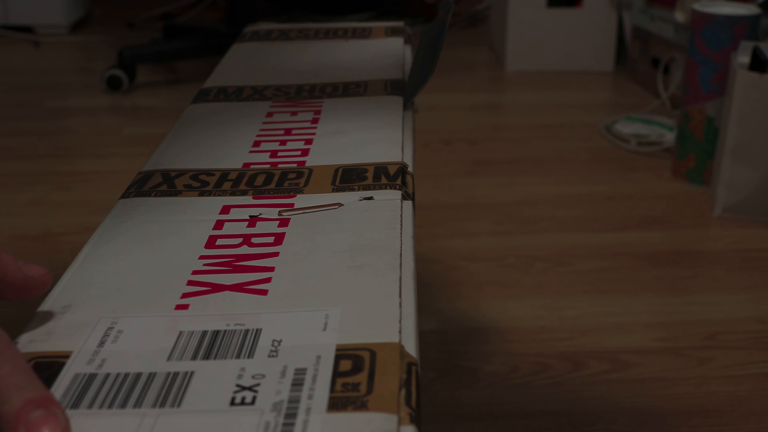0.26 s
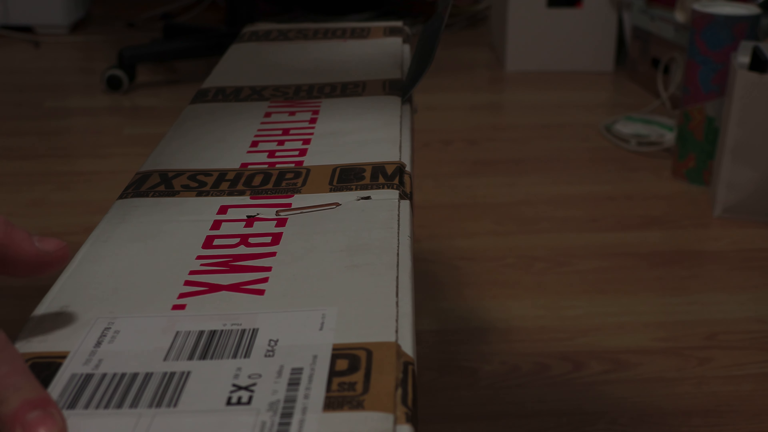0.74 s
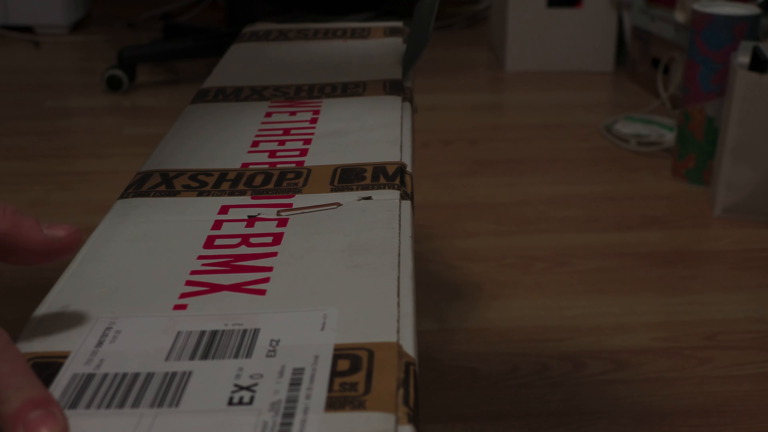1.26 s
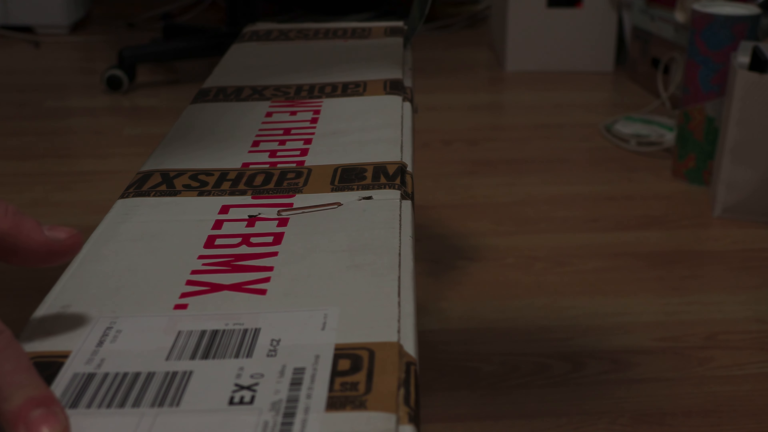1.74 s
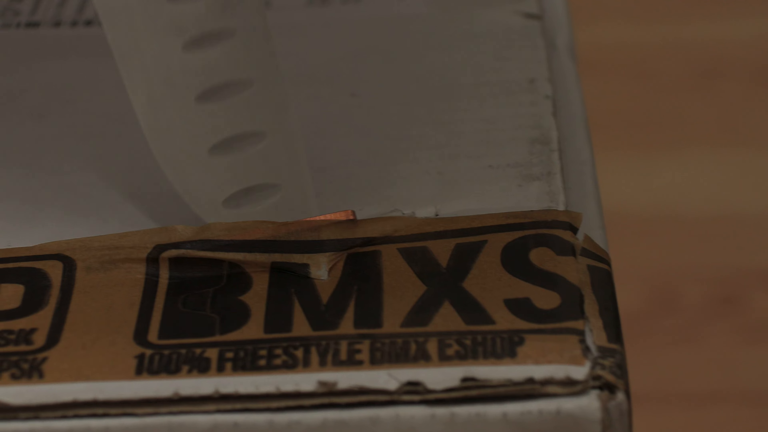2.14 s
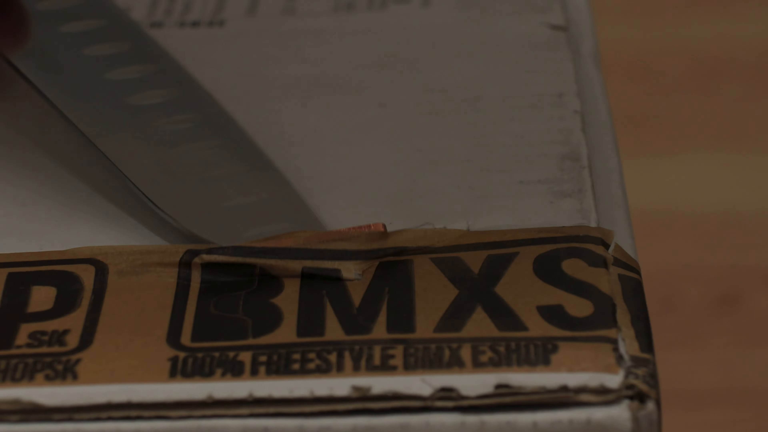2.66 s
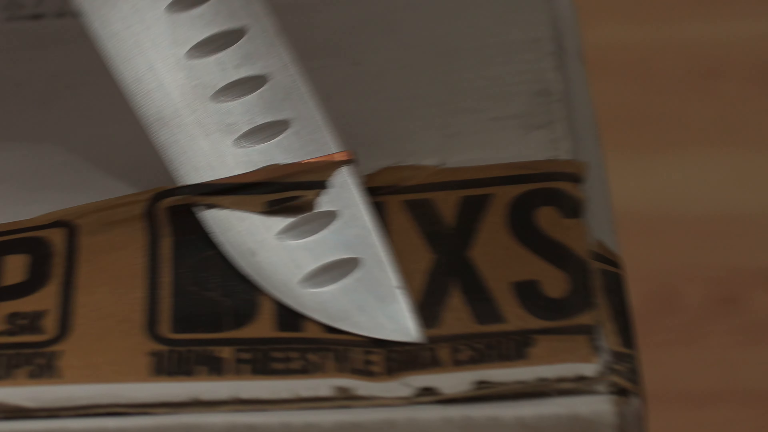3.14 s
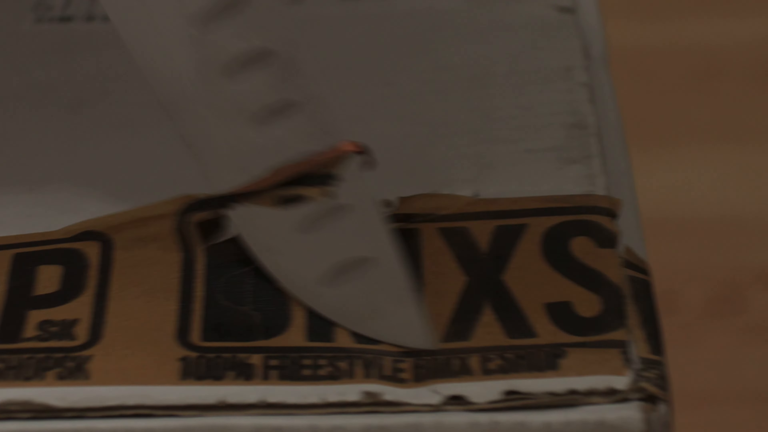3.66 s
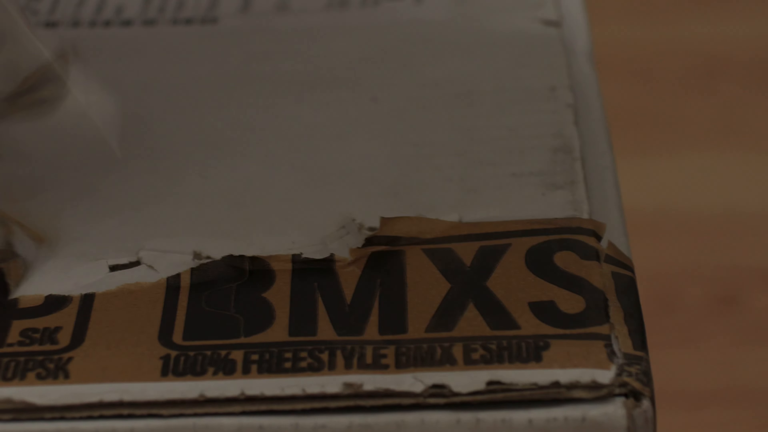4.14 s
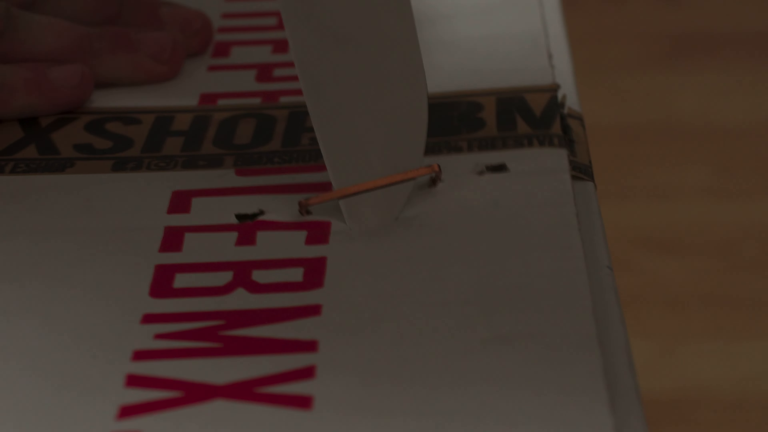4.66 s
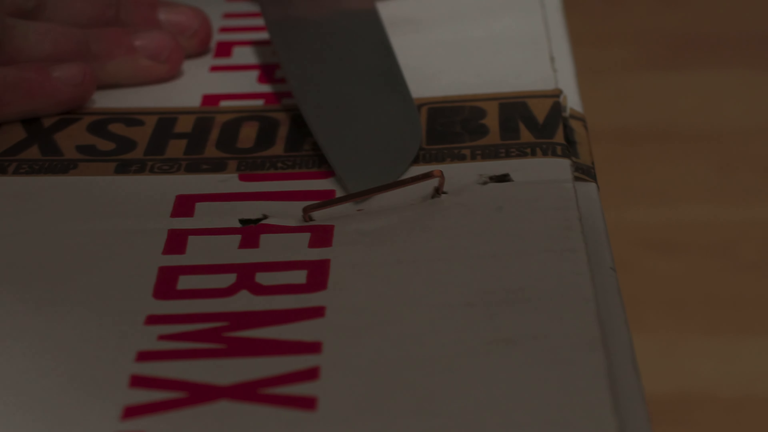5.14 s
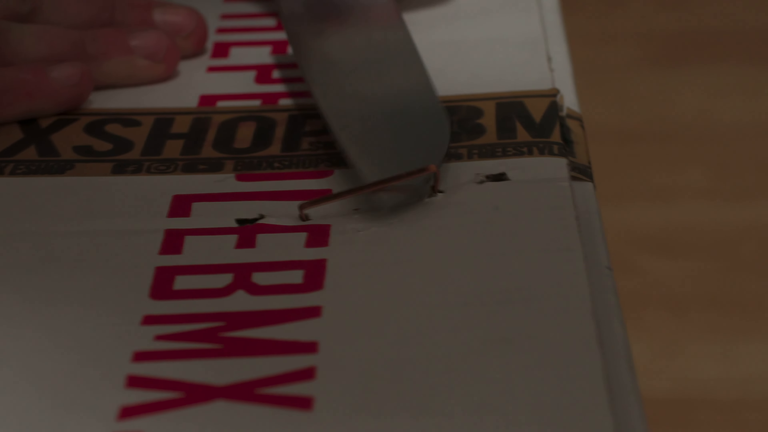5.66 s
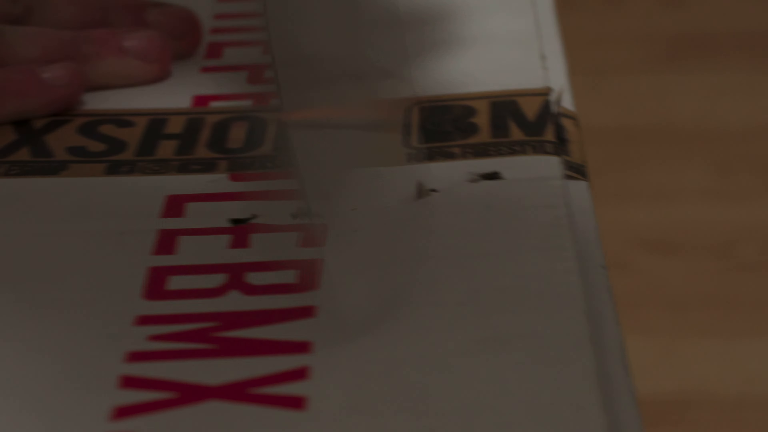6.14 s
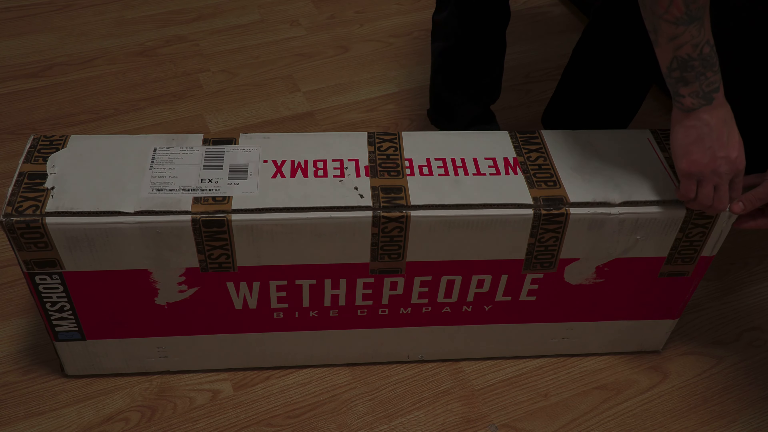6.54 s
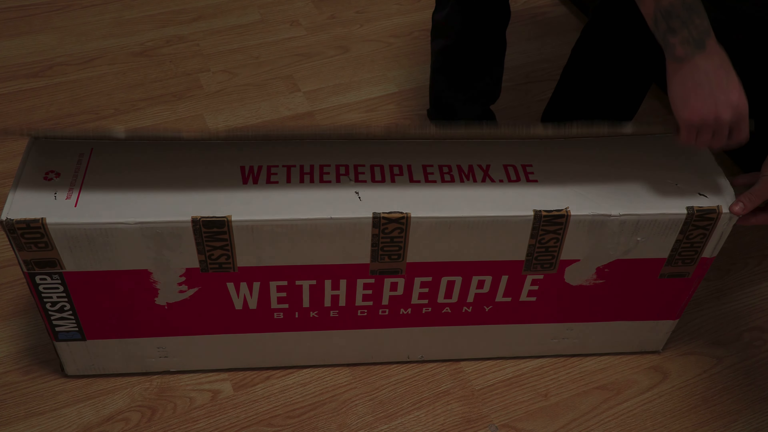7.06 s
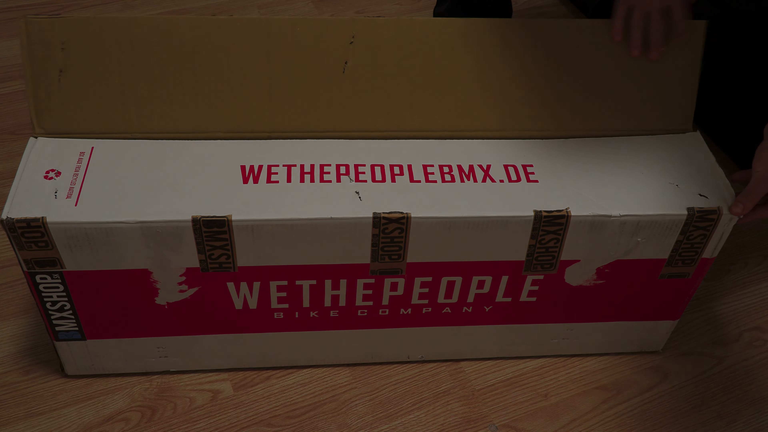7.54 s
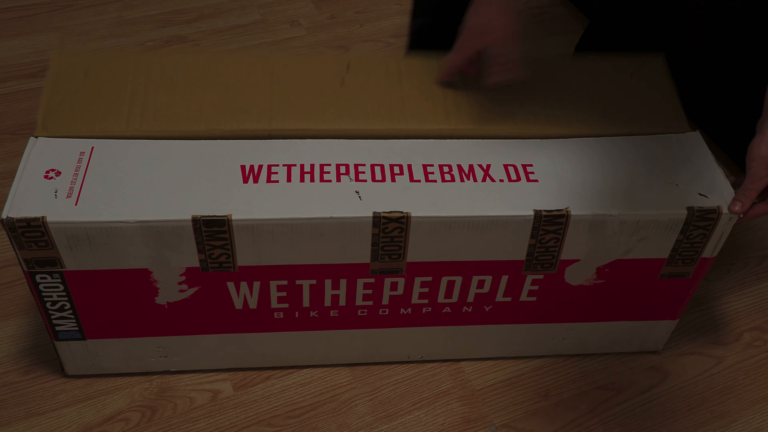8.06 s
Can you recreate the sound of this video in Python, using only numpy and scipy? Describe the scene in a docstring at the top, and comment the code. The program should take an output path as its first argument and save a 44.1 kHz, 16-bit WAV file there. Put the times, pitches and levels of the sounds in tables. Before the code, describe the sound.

A knife scrapes and saws at strapping and tape on a hollow cardboard box, with sharp snaps, boxy thumps and finally a quiet lid lift.

```python
"""A knife works under tape and staples of a long cardboard box in a hard-floored room, near a microphone pair.
Blade friction is heard from the start as stick-slip clicks through filters; fibres snap as short noise bursts.
Blows and friction excite the hollow box's modes, jolts ring the steel, and low noise swells in thuds, from the
floor or with the loudest blows. A freed staple chatters after 6.19 s; at last a hand lifts the lid, with
lighter strokes and knocks. Five shots are spliced together, and each splice cuts the room's tail short."""
import sys
import numpy as np
from scipy import signal
from scipy.fft import rfft, irfft
from scipy.io import wavfile
from scipy.ndimage import uniform_filter1d

SR = 44100
rng = np.random.default_rng(int(sys.argv[2]) if len(sys.argv) > 2 else 0)


def to_wav(s):
    """Save 16-bit WAV."""
    ch = np.atleast_2d(s).T  # columns
    pcm = np.round(np.clip(ch, -1, 1) * 32767)  # PCM
    wavfile.write(sys.argv[1], SR, pcm.astype(np.int16))


def boost(x):
    """Linear amplitude factor 10**(x/20) for a level x in decibels (scalar or array-like)."""
    u = np.asarray(x, float) / 20
    return 10 ** u


N = 366453  # samples

# Bounds of the five shots. Each entry: time in seconds.
SPLICE_TIMES = [0, 1.371, 2.126, 4.259, 6.443, 8.4]

# Spectrum of the quiet room's air and hiss. Each row: frequency in Hz, relative density in dB per Hz.
AIR_SPECTRUM = [(18, -51), (30, -60), (75, -42), (115, -36), (155, -7), (210, 1), (780, 6), (1250, 8.5),
                (1460, 6), (1630, 5.5), (2010, 5), (7870, -6.5), (14800, -20), (16000, -51)]
AIR_DB = -55  # rms over both channels
# Faint steady tones. Each row: frequency in Hz, rms level in dB, start in seconds.
WHINES = [(7671, -71, 0), (1750, -63, 6.443)]

# Low thuds: floor boards under shifting weight, and dull thumps that come with the loudest blows. Each row:
# time of greatest level in seconds, level in dB.
LOW_THUDS = [(0.0, -54), (1.16, -52), (1.27, -50), (1.43, -43.5), (2.61, -54), (2.94, -42), (3.75, -47.5),
             (3.86, -44), (4.21, -46.5), (4.47, -56.5), (5.0, -54), (5.34, -57), (5.62, -55), (6.2, -41),
             (6.3, -36.5), (6.48, -46.5), (6.69, -43), (6.9, -48.5), (7.91, -44.5), (8.22, -53)]
THUD_RISE_S, THUD_FALL_S = 0.083, 0.13  # each for 20 dB
RUMBLE_DB = -68.5  # steady floor of the rumble

# Jolts that set the steel ringing. Each row: start in seconds, peak level in dB.
STEEL_JOLTS = [(4.195, -28), (4.244, -27), (5.023, -33), (5.622, -23), (5.654, -31), (6.193, -14),
               (6.211, -15), (6.224, -14), (6.243, -15), (6.262, -10)]
# Modes of the blade. Each row: frequency in Hz, relative level in dB, 60 dB decay time in seconds.
STEEL_MODES = [(4161, -6, .04), (5090, -5, .035), (6105, -7, .07), (6625, -4, .12), (7440, -2, .06),
               (7600, 0, .035), (7750, -3, .035), (8823, -6, .045), (9905, -6, .045), (10520, -7, .04),
               (11990, -10, .05), (12420, -10, .04), (13885, -9, .1), (14500, -15, .04), (14950, -20, .05)]
# Chatter of the freed staple. Each row: time in seconds, drive level in dB.
STAPLE_CHATTER = [(6.19, -27), (6.27, -26), (6.32, -36), (6.41, -52)]

# Lower card panels, below about 600 Hz. Each row: frequency in Hz, bandwidth in Hz, relative energy in dB.
LOWER_PANELS = [(332.5, 32, -1.5), (396, 44, -1), (478, 55, 1.5), (532.6, 54, 1.5), (601, 26, -8.5)]
# Upper card panels, from about 600 Hz up. Each row: frequency in Hz, bandwidth in Hz, relative energy in dB.
UPPER_PANELS = [(673, 94, 11.5), (741, 58, 7.5), (761, 30, 5.5), (845, 77, 1.5), (996, 134, 5.5),
                (1138, 140, 3.5), (1287, 20, -6.5)]
# Air in the box. Each row: frequency in Hz, bandwidth in Hz, relative energy in dB.
AIR_CAVITY = [(139.4, 8, -7), (190, 36.5, 3), (268.3, 66, 1.5)]
# Knocks and jerks of the box, which shudders on. Each row: start in seconds, lower-panel level in dB, # upper-
# panel level in dB, cavity level in dB, time to lose 20 dB in seconds (1 ms at least).
BOX_KNOCKS = [(0.0, -58, -56, -45, 0.23), (.046, -67, -67, -51, 0.5), (.19, -49, -63, -52, -0.2),
              (.265, -38, -55, -52, -0.4), (.315, -41, -47.5, -51, 0.13), (.649, -48, -53, -59, 0.3),
              (1.06, -42, -54, -50, 0), (1.093, -30.5, -36, -42, -0.6), (1.147, -36, -32, -35, -0.4),
              (1.378, -45, -49, -54, 0.74), (1.413, -25, -30, -23, .06), (1.51, -43, -45, -50, 0.1),
              (1.57, -42, -54, -51, 0.24), (1.608, -38, -40.5, -35, 0.07), (1.65, -47, -48, -43, 0.04),
              (1.746, -38, -43, -48, .05), (1.99, -46, -46, -58, .1), (2.015, -47, -51, -52, .1),
              (2.276, -63, -51, -57, 0.05), (2.49, -51, -47, -62, 0.1), (2.623, -32, -29, -45, 0.08),
              (2.87, -31.5, -31, -48, 0.23), (2.916, -18, -10.5, -36, 0.0778),
              (2.945, -18.5, -15.5, -51, 0.0974), (2.985, -30, -24, -47, .06),
              (3.064, -47, -41.5, -59, 0.45), (3.699, -51, -34, -51, 0.28),
              (3.729, -20, -13.5, -34, 0.0063), (3.76, -38, -32, -46.5, 0.2), (3.847, -32, -23, -38, 0.06),
              (3.856, -19, -19.5, -39, .04), (4.105, -40, -41, -57, .1), (4.135, -40.5, -40.5, -50, 0),
              (4.195, -35.5, -40.5, -45, 0.06), (4.245, -52, -45, -44, .05),
              (4.452, -28.5, -33, -27.5, 0.1), (4.481, -32, -30, -44, .07), (4.561, -51, -48, -49, 0.23),
              (4.819, -44, -58, -48, .07), (4.924, -52, -50, -46, 1), (4.978, -24, -28, -28.5, 0.03),
              (5.023, -27.5, -27, -17.5, 0.02), (5.042, -44, -39, -25.5, 0.05),
              (5.1, -44, -47.5, -34, 0.04), (5.143, -50, -45, -44.5, 0.18), (5.3, -47, -42.5, -47, 0.16),
              (5.355, -44, -57, -33, .09), (5.624, -25, -19, -13, 0.1), (5.823, -41, -36, -49, 0.33),
              (6.06, -50, -40, -55, -0.1), (6.175, -24.5, -25, -19.5, -0.06),
              (6.189, -19.5, -16.5, -15, .15), (6.22, -26, -22, -18, 0.09), (6.255, -25.5, -32, -31, 0.1),
              (6.379, -43, -41, -44, 0), (6.64, -31, -32.5, -31, 0.01), (6.675, -39, -56, -36.5, 0.18),
              (6.859, -45, -47, -50, 0.18), (7.1, -57, -64.5, -61, 0.5), (7.529, -50.5, -56, -62, 0.1),
              (7.61, -66, -56, -61, 1), (7.862, -43.5, -48, -33.5, 0.18), (7.892, -50, -47.5, -43, .15),
              (8.132, -41, -46.5, -54, .1)]
BLOW_DB, SETTLE_S = 3.5, 0.0017  # peak of the first blow re the shudder; the shudder's 20 dB onset
# Friction drive of the box. Each entry: level in dB re a scrape of -40 dB, for lower panels, upper panels,
# cavity.
BOX_SHARE_DB = [-12, -11.5, -24]
BOX_FOLLOW = 0.71  # dB of box for each dB of scrape above -40: hard tearing is mostly tape

# Tape and fibres that snap. Each row: start in seconds, crack peak in dB, crack centre in Hz,
# sharp-edge peak in dB re crack.
SNAPS = [(0.0468, -20.5, 2670, -21), (0.177, -27.5, 2660, -14), (0.203, -33, 3470, -15),
         (0.2538, -36, 2470, -16), (0.6038, -39, 2940, -14), (0.649, -30, 3020, -20), (.934, -38, 7000, -7),
         (1.094, -23, 2070, -8.5), (1.1461, 1.5, 2680, -28), (1.4138, -12.5, 3730, -1.5),
         (1.5707, -29, 2400, -14), (1.609, -18, 2600, -10), (1.6493, -19.5, 5550, -21),
         (1.7461, -31, 3500, -8), (1.8513, -34, 8000, -10), (1.9413, -35, 3060, -9), (2.011, -31, 2920, 0),
         (2.1552, -20, 4430, -25), (2.2053, -29, 5000, -11), (2.2757, -30, 2720, -4), (2.3, -21, 6440, -20),
         (2.6242, -1, 3200, -15), (2.785, -27, 3370, -13), (2.8697, -17, 4500, -12),
         (2.9156, -1, 2030, -29), (2.9439, -6, 1280, -30), (2.989, -19, 6500, -15),
         (3.0665, -15.5, 2280, -16), (3.1168, -25.5, 2420, -20), (3.1608, -29, 2500, -10),
         (3.21, -20, 4570, -21), (3.3548, -22.5, 4130, -24), (3.4055, -27, 3020, -20),
         (3.5389, -26.5, 2350, -25), (3.6564, -38, 6000, -8), (3.6993, -11, 4300, -9),
         (3.7296, -12, 1400, -12), (3.8467, -15, 1730, -10), (4.0316, -29, 2340, -24),
         (4.057, -25, 2310, -19), (4.105, -15, 4600, -18), (4.1939, -30, 7000, -14.5),
         (4.2454, -25, 5560, -1), (4.323, -24.5, 5170, -22), (4.3416, -17.5, 2470, -5),
         (4.4173, -25, 7500, -5), (4.4517, -9.5, 4260, -14), (4.4826, -5, 5700, -25),
         (4.582, -20, 5700, -15), (4.9234, -35, 2870, -15), (4.977, -16, 1900, -17.5),
         (5.0233, -14, 2230, -11), (5.1426, -30, 3500, -6), (5.303, -33, 4000, -6), (5.622, 1, 1490, -9),
         (5.784, -24, 2100, -14), (5.824, -26, 2500, -15), (6.144, -36, 4000, -13),
         (6.1754, -21, 2920, -22), (6.1897, -2, 1270, -3), (6.6052, -32, 4320, -5),
         (6.6396, -12, 1910, 1.5), (6.6751, -4.5, 2160, -14), (6.8598, -17, 4200, -5),
         (7.492, -37, 3000, -15), (7.5244, -35, 2110, -20), (7.6087, -27, 1660, -22),
         (7.632, -36, 5800, -15), (7.862, -22.5, 6540, -18)]
# Spectrum of the sharp edge. Each row: frequency in Hz, relative density in dB per Hz.
EDGE_SPECTRUM = [(350, -36), (600, -28), (1430, 7.5), (2740, -3.5), (5160, 10), (6990, -8), (13000, -4),
                 (16200, -68)]

# Blade or hand dragged over card and tape. Each row: time of full pressure in seconds, time to gain the
# last 20 dB in seconds, time to lose 20 dB in seconds (both 1 ms at least), scrape in dB, sizzle in dB re scrape.
STROKES = [(0.0, .01, 0.24, -34.5, -0.5), (.19, -1.5, 0.44, -42.5, -1), (.336, 0.3, 0.2, -40.5, -1),
           (.608, -0.2, .05, -46, 0), (.652, -0.06, 0.27, -44, -1.5), (1.006, 0.07, 3, -45, -3),
           (1.102, 0.04, -1, -36, -8), (1.15, -0.0141, 0.04, -11, -12), (1.175, 0.0314, 0.13, -14, -7),
           (1.214, 0.08, 0.12, -15, -7.5), (1.384, .03, 0.7, -40.5, -4.5), (1.43, 0.1, 0.6, -37, 1.5),
           (1.612, -0.23, 0.19, -37, -1), (1.742, -0.3, .34, -43, 2), (2.02, 0.12, 0, -39.5, -2.5),
           (2.15, -2, 0.38, -45, 3.5), (2.274, 0.15, 0.14, -42, 2.5), (2.508, .12, 0.3, -46.5, -8.5),
           (2.626, -0.036, 0.05, -19.5, -5), (2.635, -0.02, 0.26, -34.5, 0), (2.87, .025, 0.14, -27, 3),
           (2.905, 0.03, 0.0358, -16.5, -7), (2.941, 0.0149, 0.09, -21.5, -19), (3.06, 0.45, .5, -39.5, -4),
           (3.22, 0.2, -0.1, -43, 1.5), (3.361, 0.4, 0.12, -39.5, 0.5), (3.547, .095, 0.08, -36, -1.5),
           (3.66, -0.04, 0.26, -38.5, -2), (3.699, 0, .03, -26, 4), (3.732, -0.0232, 0.0062, -20, 3),
           (3.766, 0.05, .085, -30, -1.5), (3.85, -0.0443, 0.02, -21, 3), (3.865, .02, 0.13, -27.5, -4.5),
           (4.03, 0.5, 0.9, -43, 1), (4.115, 0.02, .1, -28, -1), (4.16, .08, 0.12, -29.5, -3),
           (4.24, 0.13, 4.4, -42.5, 8), (4.337, 0.1, 0.25, -36.5, -1.5), (4.455, -0.05, 0.13, -32.5, 1),
           (4.485, -0.0033, .012, -14.5, -2), (4.495, .01, 0.17, -33.5, 3), (4.585, .08, 0.14, -41, 8),
           (4.85, 1.5, 0.4, -51, -0.5), (4.945, .05, .07, -35, -3), (4.98, .004, -0.03, -26, 6),
           (5.0, 0.21, 0.34, -39, -6.5), (5.14, 0.5, -0.1, -46.5, -0.5), (5.31, 0.08, .12, -38, -2.5),
           (5.36, 0.12, .11, -41.5, -1), (5.615, .07, 7.1, -51, -1), (5.625, -0.017, 0.0855, -13.5, -5.5),
           (5.65, 0.01, 0.43, -32, -1.5), (5.76, 0.1, -4, -41, -9), (5.84, -0.02, 0.05, -31.5, -5),
           (5.93, .15, .2, -28.5, -6), (5.98, 0.16, -0.06, -28.5, -7.5), (6.178, -0.08, 0.18, -25.5, -4),
           (6.193, -0.12, 0.15, -15.5, -2), (6.261, 0.18, 0.13, -22, -3), (6.33, -0.18, 0, -37, -3),
           (6.62, 0.08, 0.6, -43.5, 0.5), (6.65, 0.02, -0.0039, -22, -7), (6.678, .006, 0.1132, -23.5, -10),
           (6.845, 0.23, 0.2, -45, -16), (6.862, -0.01, .1, -27.5, -12), (7.102, 0.5, -0.2, -52.5, -12),
           (7.5, 0.3, 0.7, -52, -0.5), (7.635, 0.25, 0.4, -49, -6), (7.81, 0.17, 0.43, -42.5, 3),
           (7.894, 0.06, 0.04, -43, 2), (7.982, 0.12, 0.2, -45, 0.5), (8.15, -0.06, 0.27, -48, -0.5)]
# Centre of the scrape band. Each row: time in seconds, frequency in Hz.
SCRAPE_CENTRE = [(0, 2440), (1.1, 2500), (1.3, 2100), (1.45, 3150), (1.7, 2410), (2.2, 3330), (2.9, 2360),
                 (3.75, 2000), (4.5, 2830), (5.0, 2340), (6.3, 2400), (6.75, 1890), (6.9, 3280),
                 (7.2, 1800), (7.85, 2540), (8.31, 1940)]
# Card swallows the top of a scrape. Each row: frequency in Hz, relative gain in dB.
CARD_DAMPING = [(100, -8), (600, -1.5), (5000, 7.5), (9000, -3.5), (13000, -30.5), (16000, -40)]
# Spectrum of the sizzle. Each row: frequency in Hz, relative density in dB per Hz.
SIZZLE_SPECTRUM = [(1470, -28), (2500, 0.5), (2900, 1), (4840, 6), (5780, 4.5), (9960, -7), (14400, -16.5),
                   (16000, -91)]
# Free flaps that sing while dragged. Each row: time of full voice in seconds, 20 dB rise in seconds,
# 20 dB fall in seconds, level in dB, pitch in Hz.
SINGING_FLAPS = [(.05, 0.037, 0.049, -41.5, 1530), (1.416, 0.0038, 0.024, -27, 3900),
                 (2.63, .004, 0.061, -41, 1850), (5.33, 0.071, 0.044, -42, 2650),
                 (5.33, 0.072, 0.043, -45, 4450), (5.38, .1, 0.13, -48.5, 1130),
                 (5.66, .02, 0.11, -35, 4240), (5.83, .06, 0.095, -38.5, 1350),
                 (5.93, 0.13, 0.22, -31.5, 1023), (6.03, 0.21, 0.062, -38.5, 1080),
                 (6.643, 0.0023, .05, -25, 1610), (6.69, .03, .12, -28, 1680), (6.72, .05, .2, -38, 1500),
                 (6.864, .003, 0.079, -38, 3040), (6.864, .003, 0.11, -36.5, 3870),
                 (6.864, .003, 0.086, -41, 5170), (7.61, 0.011, .15, -46, 1750),
                 (7.61, .01, 0.076, -45.5, 1040), (7.64, .03, .25, -55, 2400)]
FLAP_WIDTH = 0.4  # bandwidth re pitch, of each resonance
RESTING_DB = -69  # light contact never stops
GRAIN_DB, GRAIN_PER_DB = 2.5, -0.04  # grain at a -40 dB scrape, coarser under a light touch

# Decay of the room. Each row: frequency in Hz, 60 dB decay time in seconds.
ROOM_DECAY = [(120, 0.15), (330, 0.13), (870, 0.28), (2300, 0.27), (6000, 0.37), (12000, 0.44)]
# Room against direct sound. Each row: frequency in Hz, level in dB.
ROOM_LEVEL = [(100, -13), (500, -22), (1500, -4), (5000, -11), (12000, -19)]
# Stereo width at the close microphone pair. Each row: frequency in Hz, side re mid in dB before an offset.
SIDE_LEVEL = [(60, -17.5), (110, 3), (200, -20), (380, -1), (700, -7), (1290, -9.5), (2380, -9), (4400, -6),
              (8120, 0.5), (15000, -10)]
# Response of the direct sound: the box radiates little below 150 Hz, and the top falls away. Each row:
# frequency in Hz, relative gain in dB.
DIRECT_RESPONSE = [(20, -36), (100, -22), (150, -3), (200, 0), (9000, 0), (13000, -2), (15200, -7),
                   (16300, -35), (18000, -70)]


def evened(x):
    """Normalisation: scales a signal to rms 1."""
    return x / np.sqrt(np.mean(x ** 2) + 1e-20)


def read(points, hz):
    """Pitch-like scale: interpolates a spectrum on a log-frequency axis."""
    f, value = np.transpose(points)
    return np.interp(np.log(hz + 1), np.log(f + 1), value)


def colour(points, size=1024):
    """Minimum phase: the Hilbert transform of log gain gives a causal response, here of energy 1."""
    gain_db = np.maximum(read(points, abs(np.fft.fftfreq(size, 1 / SR))), -100)
    log_gain = np.log(boost(gain_db))
    spectrum = np.exp(np.conj(signal.hilbert(log_gain)))
    taps = np.fft.ifft(spectrum).real[:size // 2]
    return taps / np.linalg.norm(taps)


def resonate(x, hz, width):
    """Heterodyning: shifts the curve hz down to zero, smooths, shifts back: a resonance of gain 1."""
    turn = np.exp(2j * np.pi * np.cumsum(hz * np.ones(len(x))) / SR)
    r = np.exp(-np.pi * width / SR)
    return 2 * (turn * signal.lfilter([1 - r], [1, -r], x / turn)).real


def band(x, hz, width):
    """Cascaded resonance: three in a row give steep skirts."""
    for _ in range(3):
        x = resonate(x, hz, width)
    return x


def body(modes):
    """Modal superposition: damped sines after one click, energy 1; neighbours swing in opposite sense."""
    t = np.arange(SR // 4) / SR
    ring = np.zeros(len(t))
    for k, (hz, width, db) in enumerate(modes):
        decay = np.sqrt(width) * np.exp(-np.pi * width * t)
        ring += (-1) ** k * boost(db) * decay * np.sin(2 * np.pi * hz * t)
    return ring / np.linalg.norm(ring)


def clicks(times_s, db):
    """Impulsive excitation: one click at each time."""
    train = np.zeros(N)
    np.add.at(train, (np.asarray(times_s) * SR).astype(int), boost(db))
    return train


def slips(per_s, spread_db):
    """Stick-slip friction: fibres catch and let go in random clicks, a few large, coming in clumps."""
    clump = evened(uniform_filter1d(rng.standard_normal(N), size=300))
    size_db = spread_db * (np.minimum(rng.exponential(1, N), 5) + 0.66 * clump)
    train = (rng.random(N) < per_s / SR) * rng.choice([-1., 1.], N) * boost(size_db)
    local_power = abs(uniform_filter1d(train ** 2, size=4000))
    return train / np.sqrt(local_power + 1e-9)


def swell(s, rise, fall):
    """Exponential growth and decay: 20 dB per rise or fall time, inside its own shot: (samples, gain)."""
    shot = np.searchsorted(SPLICE_TIMES, s, side="right")
    rise, fall = max(rise, 1 / 1000), max(fall, 1 / 1000)
    start = max(s - 3 * rise, SPLICE_TIMES[shot - 1])
    end = min(s + 3 * fall, SPLICE_TIMES[shot])
    at = np.arange(int(start * SR), min(int(end * SR), N))
    return at, boost(-20 * np.maximum((s - at / SR) / rise, (at / SR - s) / fall))


def quiet_room():
    """Stationary noise: room air and microphone hiss are shaped noise; whines are narrow bands of noise."""
    hz = np.fft.rfftfreq(N, 1 / SR)
    mid, side = rfft(rng.standard_normal((2, N))) * boost(read(AIR_SPECTRUM, hz))
    side = side * boost(read(SIDE_LEVEL, hz) + 4.0)
    out = boost(AIR_DB) * evened(irfft(np.array([mid + side, mid - side]), N))
    noise = rng.standard_normal(N)
    for f, db, start in WHINES:
        out += boost(db) * evened(resonate(noise, f, 30)) * (np.arange(N) >= start * SR)
    return out


def rumble():
    """Low resonance: dull noise in two low modes, its power swelling with each thud."""
    noise, power = rng.standard_normal(N), np.full(N, boost(2 * RUMBLE_DB))
    for s, db in LOW_THUDS:
        at, gain = swell(s, THUD_RISE_S, THUD_FALL_S)
        power[at] += (boost(db) * gain) ** 2
    low = resonate(resonate(noise, 71, 25), 71, 25)
    low += 1.1 * resonate(resonate(noise, 100, 41), 100, 41)
    return np.sqrt(power) * evened(low)


def steel():
    """Modal excitation: each jolt strikes another spot, so modes take other shares; chatter keeps them going."""
    out, t = np.zeros(N + SR), np.arange(SR // 2) / SR
    hz, db, t60 = np.transpose(STEEL_MODES)[:, :, None]
    draws = rng.standard_normal((len(STEEL_JOLTS), 2, len(STEEL_MODES), 1))
    for (s, jolt_db), (share, phase) in zip(STEEL_JOLTS, draws):
        decay = boost(db + 3.0 * share - 60 * t / t60)
        ring = (decay * np.sin(2 * np.pi * (hz * t + phase))).sum(0)
        out[int(s * SR):][:len(t)] += boost(jolt_db) * ring / abs(ring).max()
    chatter_db = np.interp(np.arange(N) / SR, *np.transpose(STAPLE_CHATTER), left=-200, right=-200)
    # a mode's bandwidth is ln(1000) / (pi t60)
    blade = body([(f, np.log(1000) / np.pi / decay_s, level) for f, level, decay_s in STEEL_MODES])
    chatter = boost(chatter_db) * slips(per_s=1500, spread_db=2.5)
    return out[:N] + signal.oaconvolve(chatter, blade)[:N]


def box(drives):
    """Linear response: blows (set by the peak they reach) and rubbing ring the same panels and air cavity."""
    s, *blows_db, _ = np.transpose(BOX_KNOCKS)
    out = np.zeros(N)
    for drive, modes, db in zip(drives, (LOWER_PANELS, UPPER_PANELS, AIR_CAVITY), blows_db):
        ring = body(modes)
        blows = clicks(s, db + BLOW_DB) / abs(ring).max()
        out += signal.oaconvolve(drive + blows, ring)[:N]
    return out


def snaps():
    """Sudden release of tension: a noise burst decays in 0.71 ms, with its own colour and a wide sharp edge."""
    out, t, edge_colour = np.zeros(N + 900), np.arange(900) / SR, colour(EDGE_SPECTRUM)
    for (s, db, hz, edge_db), noise in zip(SNAPS, rng.standard_normal((len(SNAPS), 900))):
        burst = noise * np.exp(-t / 0.00071)
        crack = band(burst, hz, 1.5 * hz)
        edge = np.convolve(burst, edge_colour)[:900]
        snap = crack / abs(crack).max() + boost(edge_db) * edge / abs(edge).max()
        out[int(s * SR):][:900] += boost(db) * snap
    return out[:N]


def strokes():
    """Incoherent addition: powers of strokes and shudders add into gains of scrape, sizzle and three box parts."""
    scrape, sizzle = np.full((2, N), boost(2 * RESTING_DB))
    for s, rise, fall, db, sizzle_db in STROKES:
        at, gain = swell(s, rise, fall)
        scrape[at] += (boost(db) * gain) ** 2
        sizzle[at] += (boost(db + sizzle_db) * gain) ** 2
    reference = boost(-80)  # power of a -40 dB scrape
    followed = (scrape / reference) ** BOX_FOLLOW * reference
    shudder = boost(2 * np.array(BOX_SHARE_DB))[:, None] * followed
    for s, *db, fall in BOX_KNOCKS:
        at, gain = swell(s + SETTLE_S, SETTLE_S, fall)
        shudder[:, at] += (boost(np.array(db))[:, None] * gain) ** 2
    return np.sqrt(scrape), np.sqrt(sizzle), np.sqrt(shudder)


def rubbing():
    """Friction source: slips scrape through a moving band, sizzle, make flaps sing, and drive the box."""
    scrape, sizzle, shudder = strokes()
    grain_db = GRAIN_DB + GRAIN_PER_DB * (20 * np.log10(scrape) + 40)
    train = slips(per_s=9000, spread_db=np.clip(grain_db, 0, 4.5))
    centre_hz = np.interp(np.arange(N) / SR, *np.transpose(SCRAPE_CENTRE))
    damped = signal.oaconvolve(train, colour(CARD_DAMPING))[:N]
    surface = scrape * evened(band(damped, centre_hz, 5400))
    surface += sizzle * signal.oaconvolve(train, colour(SIZZLE_SPECTRUM))[:N]
    for s, rise, fall, db, flap_hz in SINGING_FLAPS:
        at, gain = swell(s, rise, fall)
        voice = evened(band(train[at], flap_hz, FLAP_WIDTH * flap_hz))
        surface[at] += boost(db) * gain * voice
    return surface, shudder * train


def room_tails():
    """Reverberation: sparse taps of random sign, each band dying at its own speed, as a mid and a side tail."""
    taps = np.zeros((2, SR // 2 + 400))
    grid = np.arange(160, SR // 2, 20)
    at = grid + rng.integers(0, 20, (2, len(grid)))
    np.put_along_axis(taps, at, rng.choice([-1., 1.], at.shape), 1)
    hz, t, z = signal.stft(taps, SR, nperseg=256)
    t60 = np.clip(read(ROOM_DECAY, hz), .05, 2)
    z = z * boost(-60 * t / t60[:, None])
    z[1] *= boost(read(SIDE_LEVEL, hz) + 5.5)[:, None]
    # the mid tail has energy 1 before the room's level is applied
    energy = np.linalg.norm(signal.istft(z[0], SR, nperseg=256)[1])
    mid, side = signal.istft(z * boost(read(ROOM_LEVEL, hz))[:, None], SR, nperseg=256)[1]
    return np.array([mid + side, mid - side]) / energy


def scene():
    """Reverberation by shot: three random tails alternate to smooth the room's colour; none outlasts its splice."""
    surface, drives = rubbing()
    direct = surface + snaps() + box(drives) + steel()
    direct = signal.oaconvolve(direct, colour(DIRECT_RESPONSE, size=4096))[:N]
    out = quiet_room() + rumble()
    edges = (np.array(SPLICE_TIMES) * SR).astype(int)
    turn = 2 * np.pi * 2.3 * np.arange(N) / SR  # the tails alternate at 2.3 Hz
    for a, b in zip(edges, edges[1:]):
        shot = direct[a:b]
        wet = np.zeros((2, len(shot)))
        for k in range(3):
            share = np.cos(turn[a:b] + k * np.pi / 3)
            wet += signal.oaconvolve((shot * share)[None], room_tails(), axes=1)[:, :len(shot)]
        wet *= np.sqrt(2 / 3)  # the squared shares sum to 3/2
        fade = signal.windows.tukey(len(shot), 500 / len(shot))  # 250 samples at each end
        out[:, a:b] += fade * (shot * boost([[.1], [-.1]]) + wet)
    return out


def band_limit(x):
    """A steep low-pass at the top of the band."""
    return signal.sosfilt(signal.butter(12, 16380, fs=SR, output="sos"), x)


def record(dry):
    """Saturation: the loudest peaks meet full scale at a soft knee."""
    mix = dry / (1 + abs(dry) ** 6) ** (1 / 6)
    return band_limit(mix)


dry = scene()
out = record(dry)
to_wav(out)
```